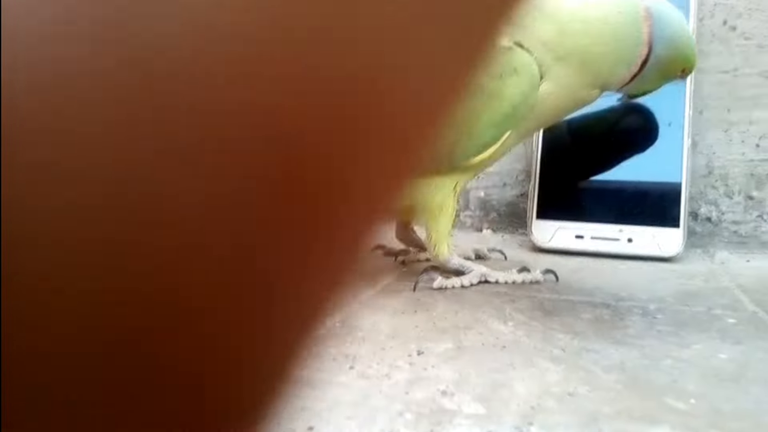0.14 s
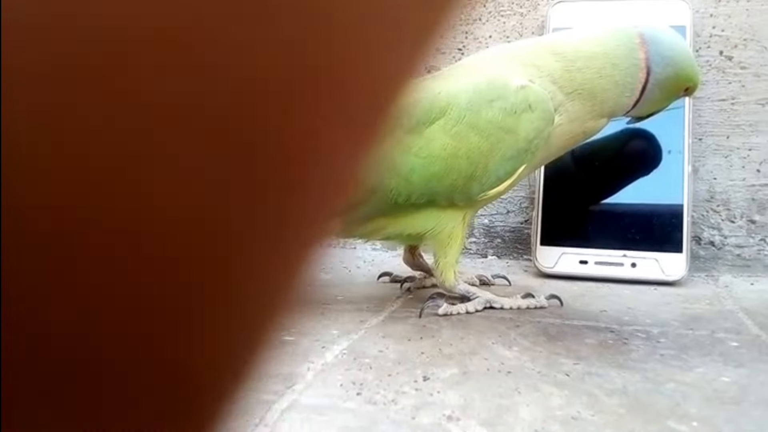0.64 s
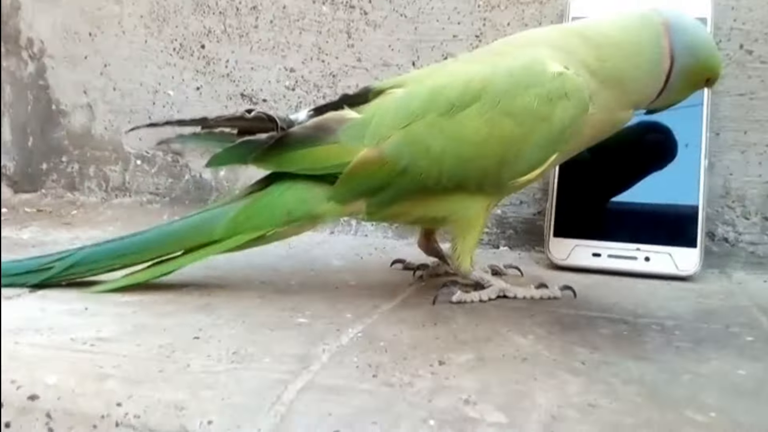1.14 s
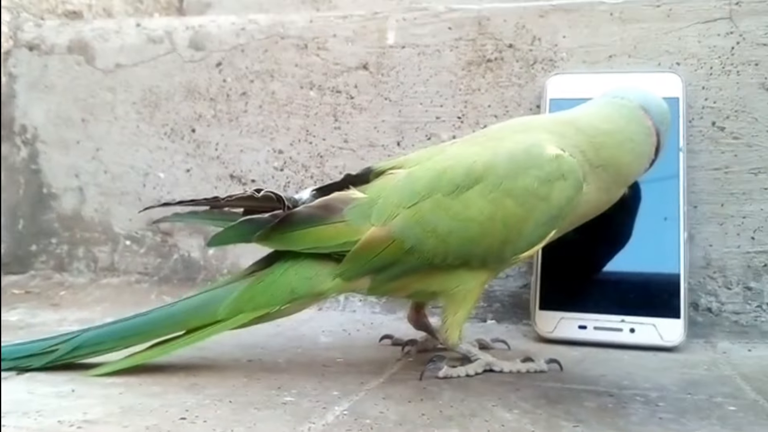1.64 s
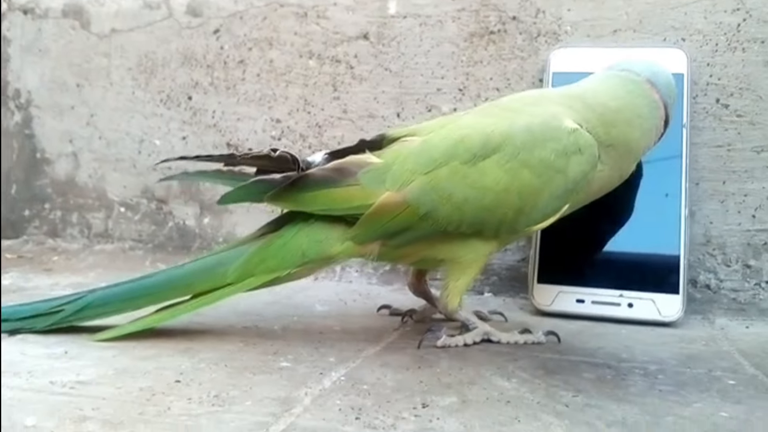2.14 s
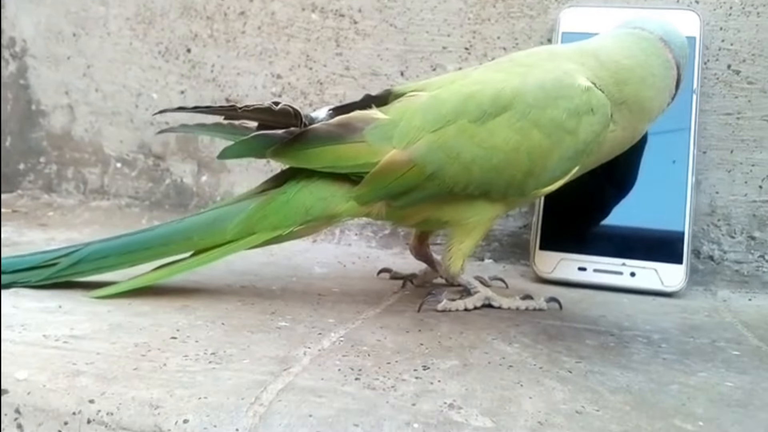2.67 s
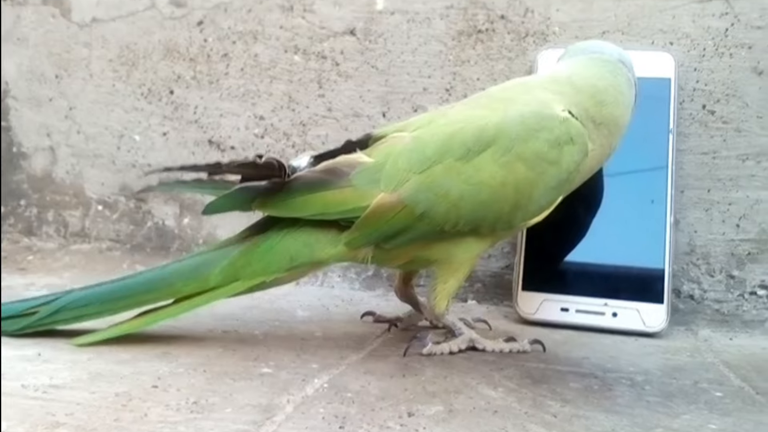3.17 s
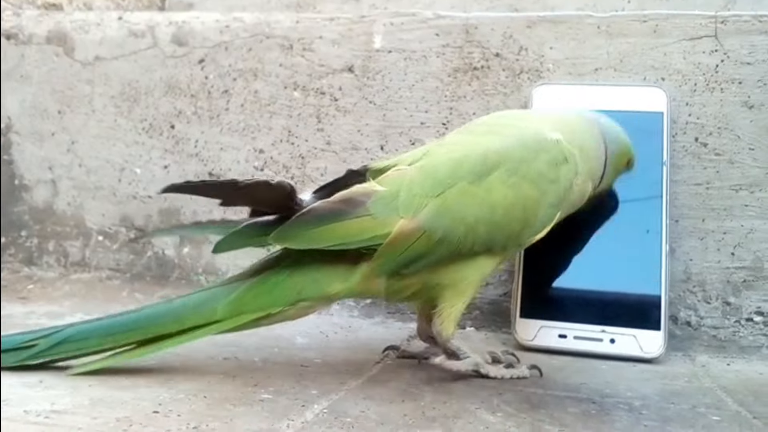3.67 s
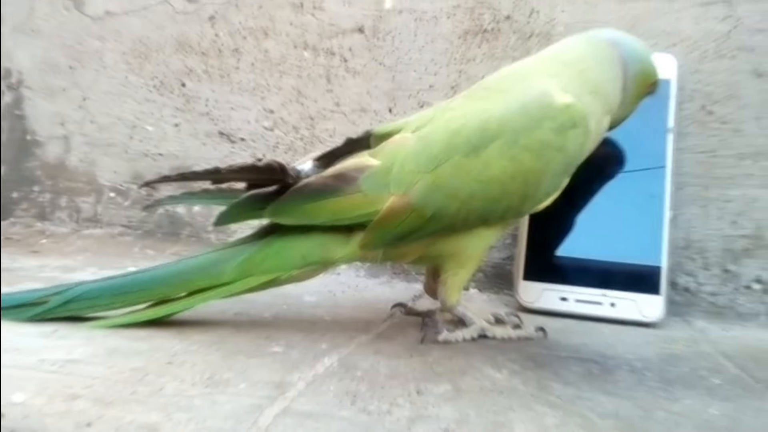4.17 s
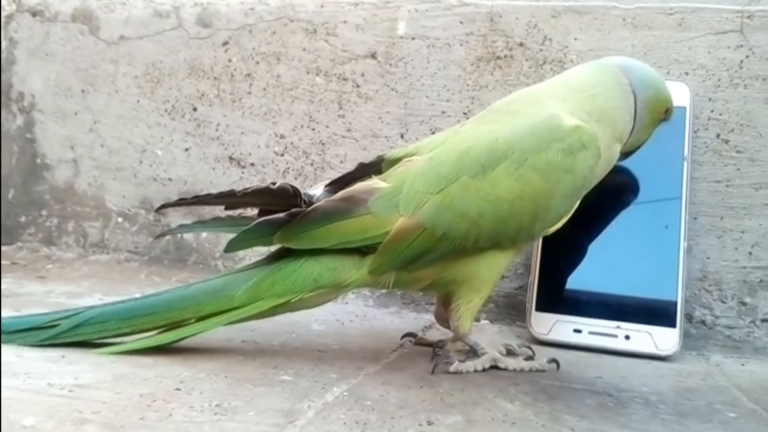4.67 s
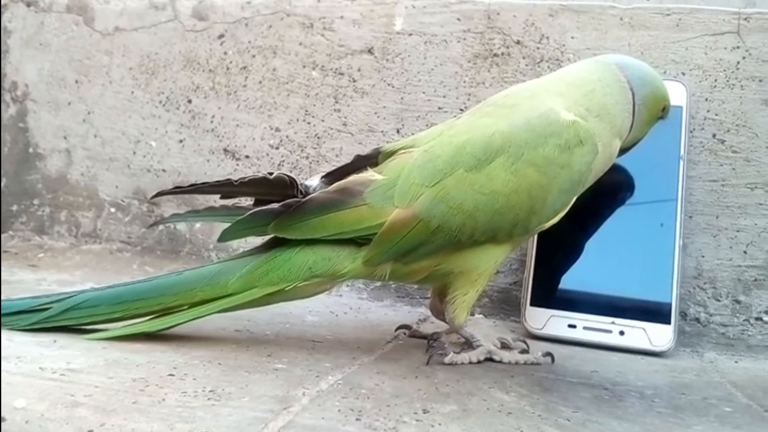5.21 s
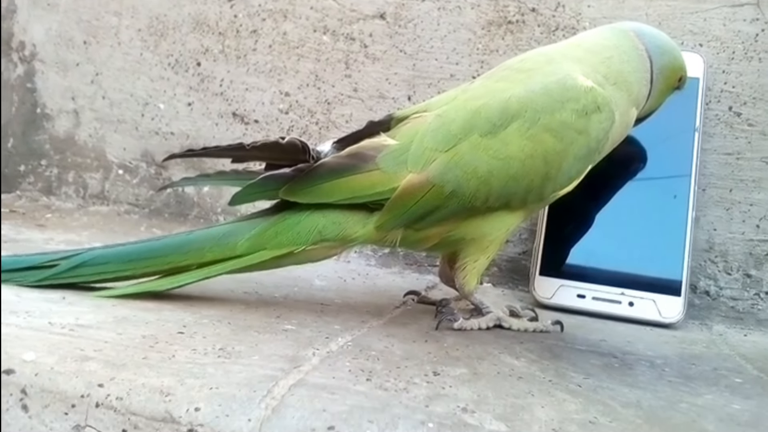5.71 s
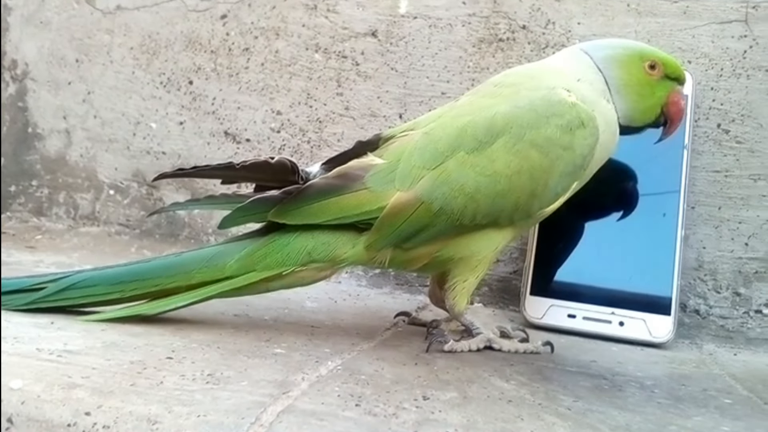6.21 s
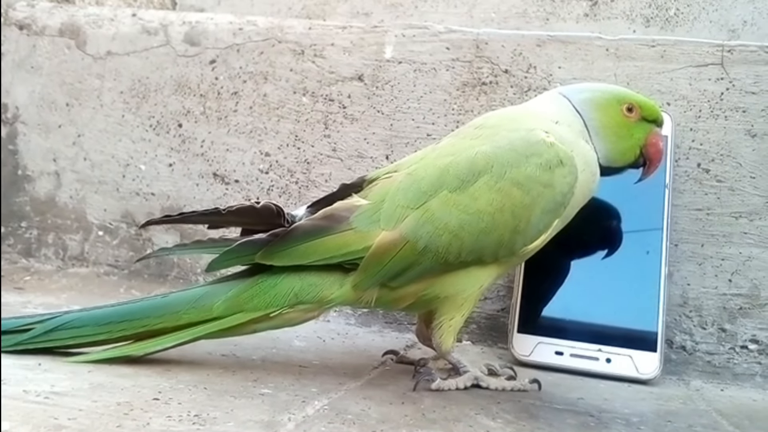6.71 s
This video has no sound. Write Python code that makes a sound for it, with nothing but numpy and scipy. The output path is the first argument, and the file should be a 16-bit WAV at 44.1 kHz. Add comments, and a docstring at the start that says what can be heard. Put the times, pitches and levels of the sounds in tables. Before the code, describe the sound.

A parakeet close to a phone microphone in a hard-walled yard. Dry clicks and a faint throaty purr come first, then low nasal mutters, with a soft wind gust beneath. Two quick rising whistles, a harsh chirp and two whistles that tumble downward follow. After a short pause come a trilled falling squawk, a bright descending call and a final low-to-high swoop. The last stretch is nearly silent, with faint town hum.

```python
"""A concrete yard, with a parakeet close to a phone microphone and a town humming far away.
The bird chatters: harmonic stacks, coloured by throat and beak, make whistles, slides and a trilled squawk;
short snaps make the clicks and a pulsed throat resonance the purr. The near corner and the yard's walls
answer with decaying noise. Shaped noise makes soft puffs, wind buffeting the microphone and the town."""
import sys
import numpy as np
from scipy import signal
from scipy.fft import rfft, irfft, next_fast_len
from scipy.io import wavfile
from scipy.ndimage import uniform_filter1d, map_coordinates

SR = 44100
rng = np.random.default_rng(int(sys.argv[2]) if len(sys.argv) > 2 else 0)


def transcribe(signal):
    """Save signal, clipped to [-1, 1], as a 16-bit WAV file at the path in sys.argv[1]."""
    frames = np.atleast_2d(signal).T
    limited = np.clip(frames, -1, 1)
    pcm = np.round(limited * 32767).astype(np.int16)
    wavfile.write(sys.argv[1], SR, pcm)


def gain_from_db(level_db):
    """Turn a decibel level (scalar or array-like) into a linear amplitude factor."""
    decades = np.asarray(level_db, float) / 20
    return 10 ** decades


N = 301644  # samples

# The bird's calls, one list of points each: time_s, pitch_hz, level_db, tilt_db_per_octave, beak_resonance_hz
CALLS = [
    [(0.363, 730, -78, -1, 5500), (0.373, 920, -46, -13, 4900), (0.385, 687, -34, -4.5, 4840),
     (0.403, 593, -33.5, -5.5, 5100), (0.49, 573, -29, -4, 4960), (0.525, 516, -32.5, -4.5, 5400),
     (0.547, 391, -42, -7.5, 1600), (0.559, 340, -32, -9, 1700)],
    [(1.125, 451, -52, -6, 1000), (1.163, 443, -42, -9, 1620), (1.173, 469, -30.5, -5.5, 1800),
     (1.227, 538.5, -29.5, -2.5, 3930), (1.275, 517.3, -27.5, -6, 1800), (1.313, 539.6, -37.5, -16.5, 1420),
     (1.333, 582, -27, -9.5, 1660), (1.35, 558.7, -23.5, -1.5, 1800), (1.39, 583, -27.5, 0.5, 4170),
     (1.405, 520, -49, -24.5, 4060)],
    [(1.527, 656, -73.5, -1, 2270), (1.533, 606, -24, -1.5, 4580), (1.605, 566, -21.5, -2, 2200),
     (1.651, 549.4, -30, -12.5, 1340), (1.759, 599.4, -30, -9, 1510), (1.793, 660.3, -25.5, -11, 1400),
     (1.815, 584, -30.5, -9, 1250), (1.833, 417, -36, -7.5, 1190)],
    [(2.15, 1227, -58.5, -11.5, 1100), (2.166, 1129, -36.5, -27, 6500), (2.194, 1093, -29, -18.5, 1800),
     (2.226, 1405, -28.5, -22, 6500), (2.246, 1433, -21, -21.5, 1300), (2.258, 1634, -31, -2, 5700),
     (2.286, 1839, -17, -11.5, 5700), (2.304, 2164, -36, 11, 6160), (2.316, 2256, -21.5, -37.5, 6500),
     (2.332, 2307, -44.5, -12.5, 6500)],
    [(2.44, 1564, -55, -22.5, 6160), (2.46, 1565, -41.5, -37, 6100), (2.518, 1536, -31.5, -19, 6100),
     (2.604, 1555, -28, -9.5, 6300), (2.63, 1868, -22, -3, 2000), (2.636, 2010, -39, 18, 2000),
     (2.644, 2268, -23.5, -20.5, 5830), (2.654, 2760, -25.5, -17.5, 6460), (2.664, 2710, -48.5, -2, 2410)],
    [(2.856, 423, -52, -8, 2600), (2.86, 554, -23, -3.5, 1900), (2.88, 709, -16, -0.5, 1900),
     (2.894, 1555, -24.5, -8, 6200), (2.904, 1079, -20, 6, 1900), (2.918, 577, -18, -2.5, 6100),
     (2.934, 653, -34.5, -2.5, 5700), (2.94, 579, -39.5, -5.5, 3100)],
    [(3.888, 1539, -57, -13.5, 3390), (3.91, 1494, -35, -3, 1395), (3.944, 1455, -21.5, -5.5, 4650),
     (4.0, 1378, -20.5, -2.5, 4640), (4.03, 1246, -18.5, -1, 4750), (4.112, 1035, -16.5, -1.5, 4720),
     (4.19, 910.5, -18, -1.5, 4200), (4.32, 907.3, -17, -2.5, 2640), (4.342, 876, -28, -4, 2600)],
    [(4.465, 2093, -56.5, -12, 4400), (4.473, 2010, -20, -6.5, 3800), (4.492, 2009, -20.5, -1, 4400),
     (4.525, 1776, -16, -2, 4170), (4.541, 1794, -15.5, -2, 4400), (4.572, 1661, -20.5, -4, 4730),
     (4.609, 1602, -20, 0, 5210), (4.645, 1229, -20, -2.5, 2320), (4.657, 1201, -13.5, -3, 2520),
     (4.677, 1156, -26.5, -8, 2230), (4.689, 1157, -19.5, -4, 2290), (4.699, 1210, -61.5, -3.5, 2360)],
    [(4.852, 464.4, -54, -13.5, 1000), (4.865, 540, -39, -15.5, 1100), (4.873, 728.4, -42, -13.5, 1400),
     (4.9, 704.3, -28.5, -13, 1540), (4.95, 755.4, -21, -1, 2380), (4.98, 903.3, -16, 0.5, 1910),
     (4.996, 1296, -23.5, -1, 2730), (5.045, 1431, -17.5, -0.5, 4104), (5.08, 1529, -19, 0, 4120),
     (5.115, 1495, -20, 2, 5260), (5.139, 1325, -18, 0.5, 4260), (5.157, 1003, -58.5, 0.5, 4320)],
]
# Timbre of each call: notch_multiple_of_pitch, steady_hoarseness_0_to_1, cracked_ending_s
CALL_TIMBRE = [(3.9, 0, 0.017), (5.3, 0, 0), (5.1, 0, 0.058), (2.1, 0.05, 0.0027), (2, 0.02, 0),
               (2.1, .35, 0.0017), (1.15, 0.03, 0), (.9, 0, 0.0071), (1.1, 0.01, 0.021)]
# A whistle that breaks off and tumbles down:
# time_from_start_s, pitch_hz, level_db (before the gain below), tilt_db_per_octave, beak_resonance_hz
TUMBLE = [(0, 2391, -63.5, -2.5, 4930), (.006, 2835, -49, -5, 5380), (.027, 2465, -25.5, -5.5, 5190),
          (0.05, 2432, -28.5, 0, 5400), (.072, 2501, -17, -5.5, 5630), (0.079, 2564, -35.5, 0.5, 5050),
          (.086, 2592, -19.5, -2, 2751), (0.09, 1764, -27.5, 3.5, 2750), (.108, 1450, -22, 2.4, 2050),
          (.121, 992, -25, 1.9, 1677), (.132, 611.5, -22, -5, 2052), (0.151, 555, -39, -9, 3810)]
# Its timbre: notch_multiple_of_pitch, steady_hoarseness_0_to_1, cracked_ending_s
TUMBLE_TIMBRE = (1.525, 0.0049, 0.012)
# When that whistle sounds: start_s, gain_db
TUMBLE_STARTS = [(3.001, 3.14), (3.242, 2.77)]
# Flutter of the long squawk: time_s, pitch_swing_share
SQUAWK_SWING = [(3.887, .01), (3.995, .025), (4.03, .115), (4.14, .135), (4.185, 0.09), (4.345, 0.075)]
# Its pace: time_s, flutter_beats_so_far
SQUAWK_BEATS = [(3.889, 0), (4.182, 15), (4.302, 20), (4.345, 21.1)]
# Fixed colour of the bird's throat: frequency_hz, gain_db
THROAT_COLOUR = [(450, -9), (650, -5), (860, 1), (1100, -1), (1400, -2.5), (1770, 6), (2100, -2.5),
                 (2500, 0.5), (3000, -7), (3500, -5), (4000, -12.5), (4700, -6), (5500, -16.5),
                 (6500, -17.5), (7500, -38.5), (8500, -46), (9700, -45.0), (11500, -66), (14000, -70.5)]
# Snaps of the syrinx: time_s (each begins 2 ms ahead), peak_db, tilt_db_per_octave, noisy_share_0_to_1
SNAPS = [(0.015, -35, 0.5, 0.16), (.186, -17.5, 1.5, 0.07), (.825, -43, -8, .3), (.985, -9.5, 3.5, 0.8),
         (1.344, -26.5, 7, 0.04), (2.068, -50.5, -13.5, 1), (3.744, -55.5, -1, 1), (3.761, -37.5, -4, 0.97)]
# Swell of the purr: time_s, peak_db (before a random spread from flap to flap)
PURR_SWELL = [(0.197, -37), (0.212, -40), (.31, -40), (0.342, -44)]
# How long the yard rings: frequency_hz, t60_s
YARD_DECAY = [(500, 0.79), (2500, 0.41), (6000, 0.44), (10000, 0.058)]
# Faint soft noises: peak_time_s, rise_s, fall_s (both to 1/e), centre_hz, width_hz, level_db
SOFT_PUFFS = [(.84, .03, .04, 1900, 3000, -53), (.72, .02, .06, 3000, 500, -64),
              (5.93, .03, .04, 2600, 1500, -72), (6.09, .03, .2, 900, 170, -65),
              (6.1, .04, .17, 400, 300, -64), (6.71, .02, .05, 3400, 400, -73),
              (2.252, .004, .01, 350, 600, -43)]
# Strength of the wind at the microphone: time_s, level_db
WIND_LEVEL = [(0.0, -60), (0.85, -68), (0.95, -50.5), (1.1, -72), (1.22, -43.5), (1.4, -49), (1.7, -23.5),
              (1.9, -40), (2.05, -57), (2.2, -53.5), (2.6, -54.5), (2.75, -63.5), (5.25, -68), (5.5, -60.5),
              (6.0, -67.5), (6.12, -46.5), (6.5, -63.5), (6.8, -65)]
# Relative spectrum of the wind: frequency_hz, density_db_per_hz
WIND_COLOUR = [(20, -26), (45, -5.5), (60, 3.5), (150, 0), (200, -8), (380, -23.5), (600, -51),
               (1000, -100)]
# Strength of the distant town: time_s, level_db (before a 1.5 dB trim and a slight drift)
TOWN_LEVEL = [(0, -65), (1.3, -67.5), (5.9, -69), (6, -72), (6.08, -72.5), (6.84, -70.5)]
# Relative spectrum of the town: frequency_hz, density_db_per_hz
TOWN_COLOUR = [(150, -28.5), (250, -7.5), (450, -12.5), (600, -13.5), (686, -1), (800, -17.5), (950, -16),
               (2700, -24), (5600, -28.5), (7500, -38.5), (9700, -38.5), (15400, -43.5)]

GLIDE_S = 0.005  # the syrinx cannot turn a sharper corner
# Hoarseness for each octave a second of falling pitch, the span that averages the fall, and the limit
HOARSE_PER_FALL, FALL_MEMORY_S, HOARSE_MOST = 0.014, 0.012, 0.45
CRACKED, CRACK_RISE_S = 1.6, 0.007  # hoarseness added at a cracked ending, and its onset
# Squawk: extra depth of the first gaps between beats, how soon they close, and the dip that remains
PULSING_DB, PULSING_FADES_S, PULSING_STAYS_DB = 30, 0.11, 4
PURR_RATE_HZ, PURR_MODE_HZ = 81.5, 1000
HARMONICS = 24


def voice(jitter, shimmer_db):
    """The syrinx sings; fast falls in pitch turn it hoarse, and each harmonic then flickers on its own."""
    out = np.zeros(N)
    drift, shake, rasp = wobble(180), wobble(90), unit(wobble(600))
    calls = list(zip(CALLS, CALL_TIMBRE))
    for start_s, gain_db in TUMBLE_STARTS:
        rows = [(start_s + s, hz, db + gain_db, *colour) for s, hz, db, *colour in TUMBLE]
        calls.append((rows, TUMBLE_TIMBRE))
    k = np.arange(1, HARMONICS + 1)[:, None]

    for rows, (notch_multiple, steady, crack_s) in calls:
        i = np.arange(round(rows[0][0] * SR), round(rows[-1][0] * SR))
        t = i / SR
        hz, db, tilt, beak_hz = curves(rows, t)
        hz = uniform_filter1d(hz, size=round(GLIDE_S * SR), mode='nearest')
        notch_hz = notch_multiple * hz

        fall = np.maximum(-np.gradient(np.log2(hz)) * SR, 0)  # octaves a second
        fall = uniform_filter1d(fall, size=round(FALL_MEMORY_S * SR))
        time_left = (i[-1] - i) / SR
        hoarse = np.clip(steady + HOARSE_PER_FALL * fall, 0, HOARSE_MOST)
        hoarse = hoarse + CRACKED * np.clip((crack_s - time_left) / CRACK_RISE_S, 0, 1)

        trill_start = SQUAWK_SWING[0][0]
        trilled = (t > trill_start) * (t < SQUAWK_SWING[-1][0])
        swing = trilled * curves(SQUAWK_SWING, t)[0]
        gap_fade = np.exp(-((t - trill_start) / PULSING_FADES_S) ** 2)
        swing_db = trilled * (PULSING_STAYS_DB + PULSING_DB * gap_fade)
        beat = curves(SQUAWK_BEATS, t)[0] % 1
        hz = hz * (1 - swing * np.cos(2 * np.pi * beat))
        hz = hz * (1 + (jitter + 0.025 * hoarse) * drift[i])
        dip = np.cos(np.pi * beat ** 0.75) ** 4  # each beat swells fast, fades slowly
        db = db - swing_db * dip + shimmer_db * shake[i]

        flicker = rasp[(i + N // HARMONICS * (k - 1)) % N]  # a different stretch for each harmonic
        share = np.clip(hoarse * (k * hz / 2200) ** 1.5, 0, 0.9)  # higher harmonics smear first
        rough = np.sqrt(1 - share) + np.sqrt(share) * flicker
        edge = np.minimum(1, np.minimum(i - i[0], i[-1] - i) / (0.0017 * SR))
        out[i] = edge * gain_from_db(db) * stack(hz, tilt, beak_hz, notch_hz, rough)
    return filtered(out, lambda hz: 1 / (1 + (330 / (hz + 1)) ** 8))  # so small a bird radiates no bass


def stack(hz, tilt, beak_hz, notch_hz, rough=1):
    """Harmonics of a moving pitch near rms 1: effort sets the level, the tract only the colour."""
    k = np.arange(1, HARMONICS + 1)[:, None]
    size = tract(k * hz, tilt, beak_hz, notch_hz) * (k * hz < 15000)
    size /= np.sqrt(np.sum(size ** 2, axis=0) / 2)
    phase = 2 * np.pi * np.cumsum(hz) / SR
    return np.sum(size * rough * np.sin(k * phase + 0.32 * k ** 2), axis=0)


def tract(hz, tilt, beak_hz, notch_hz):
    """Gain of throat and beak: fixed colour, a slope, one moving peak and one moving notch."""
    def bump(centre_hz):
        return np.exp(-((hz - centre_hz) / 550) ** 2)

    slope_db = tilt * np.log2(np.minimum(hz, 7000) / 2000)
    return gain_from_db(along(THROAT_COLOUR, hz) + slope_db + 9.0 * bump(beak_hz) - 8.6 * bump(notch_hz))


def clicks(rise_s, fall_s, pitch_hz):
    """The syrinx snaps open for a few cycles, mixed with a dry crack of air."""
    out, t = np.zeros(N), np.arange(SR // 30) / SR
    envelope = (1 - np.exp(-t / rise_s)) ** 3 * np.exp(-t / fall_s)
    for s, peak_db, tilt, noisy in SNAPS:
        hiss = rng.standard_normal(len(t))
        crack = unit(filtered(hiss, lambda hz: tract(hz + 1, tilt, 2800, 350) * (hz > 600)))
        tone = stack(pitch_hz + 0 * t, tilt, 1400, 2400)
        blip = (np.sqrt(1 - noisy) * tone + np.sqrt(noisy) * crack) * envelope
        out[round((s - 0.002) * SR):][:len(t)] += gain_from_db(peak_db) * blip / np.abs(blip).max()
    return out


def purr():
    """Slow, slightly uneven flaps ring a low throat mode and faintly the rest of the tract."""
    s = np.arange(PURR_SWELL[0][0], PURR_SWELL[-1][0], 1 / PURR_RATE_HZ)
    luck = rng.standard_normal((len(s), 2))
    at = np.round((s + 0.0004 * luck[:, 0]) * SR).astype(int)
    flaps = np.zeros(N)
    # the resonances spread each impulse out, so it is driven 41.5 dB harder
    flaps[at] = gain_from_db(curves(PURR_SWELL, s)[0] + 41.5 + 1.2 * luck[:, 1])

    def throat(hz):
        upper = peak(hz, 3000, 500) ** 2 + peak(hz, 4600, 700) ** 2
        return peak(hz, PURR_MODE_HZ, 330) ** 4 + gain_from_db(-34) * upper

    return filtered(flaps, throat)


def walls(x, delay_s, t60):
    """A delayed answer of decaying noise; t60 gives the decay time at each frequency."""
    hz, t, z = signal.stft(rng.standard_normal(SR), SR, nperseg=256)
    tail = signal.istft(z * gain_from_db(-60 * t / t60(hz)[:, None]), SR, nperseg=256)[1]
    delayed = np.pad(x, (round(delay_s * SR), 0))
    return signal.fftconvolve(delayed, tail / np.linalg.norm(tail))[:N]


def puffs():
    """Brief soft swells of band noise."""
    out, t = np.zeros(N), np.arange(N) / SR
    for s, rise_s, fall_s, centre_hz, width_hz, db in SOFT_PUFFS:
        swell = np.exp(-((t - s) / np.where(t < s, rise_s, fall_s)) ** 2)
        band = noise(lambda hz: peak(hz, centre_hz, width_hz) ** 2 / (1 + (hz / 6000) ** 6))
        out += gain_from_db(db) * swell * band
    return out


def wind():
    """Wind buffets the microphone port: low noise in uneven lumps, rising and falling in gusts."""
    lumps = gain_from_db(2 * wobble(11) + 3.5 * wobble(30))
    buffeting = unit(lumps * noise(lambda hz: gain_from_db(along(WIND_COLOUR, hz))))
    return gain_from_db(curves(WIND_LEVEL, np.arange(N) / SR)[0]) * buffeting


def town():
    """The far hum: steady coloured noise whose level drifts slightly."""
    db = curves(TOWN_LEVEL, np.arange(N) / SR)[0] - 1.5 + 0.3 * wobble(2.5)
    return gain_from_db(db) * noise(lambda hz: gain_from_db(along(TOWN_COLOUR, hz)))


def unit(x):
    """Scaled to rms 1."""
    return x / np.sqrt(np.mean(x ** 2) + 1e-20)


def along(points, hz):
    """(Hz, value) points read on a log frequency axis."""
    f, v = np.transpose(points)
    return np.interp(np.log(hz + 1), np.log(f + 1), v)


def curves(rows, t):
    """Each column after the time, read at times t."""
    s, *cols = np.transpose(rows)
    return [np.interp(t, s, c) for c in cols]


def wobble(rate):
    """A smooth random curve, rate knots a second."""
    return map_coordinates(rng.standard_normal(int(N * rate / SR) + 4), [np.arange(N) * rate / SR])


def filtered(x, response):
    """x shaped by a complex response of frequency."""
    m = next_fast_len(len(x) + 8192)
    return irfft(rfft(x, m) * response(np.fft.rfftfreq(m, 1 / SR)), m)[:len(x)]


def noise(response):
    """Coloured noise of rms 1."""
    return unit(filtered(rng.standard_normal(N), response))


def peak(hz, centre_hz, width_hz):
    """Response of one causal resonance."""
    return 1j * hz * width_hz / (centre_hz ** 2 - hz ** 2 + 1j * hz * width_hz)


def scene():
    """The close bird, its near corner and farther walls, then puffs, wind and town."""
    calls = voice(jitter=0.0025, shimmer_db=0.6)
    bird = calls + clicks(rise_s=0.001, fall_s=0.0035, pitch_hz=905.3) + purr()
    corner = gain_from_db(-13) * walls(bird, 0.003, lambda hz: 0.06 + 0 * hz)
    yard = gain_from_db(-24.5) * walls(bird, 0.018, lambda hz: along(YARD_DECAY, hz))
    mix = bird + corner + yard + puffs() + wind() + town()
    return mix[None]  # one channel


def band_limit(x):
    """A steep low-pass at the top of the band."""
    return signal.sosfilt(signal.butter(12, 15480, fs=SR, output="sos"), x)


def record(dry):
    """The finished mix leaves the microphone, its treble cut off steeply above about 15.5 kHz."""
    return band_limit(dry)


dry = scene()
out = record(dry)
transcribe(out)
```